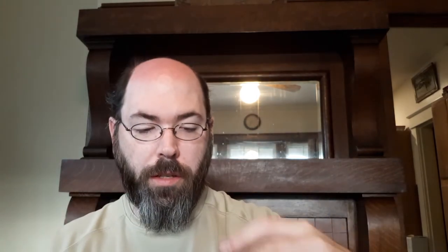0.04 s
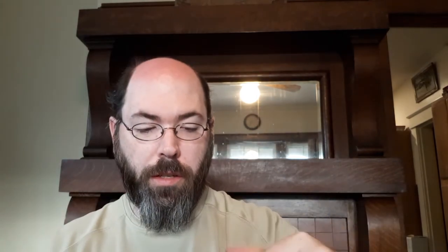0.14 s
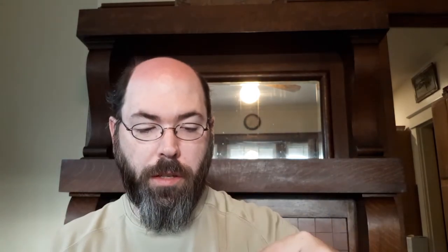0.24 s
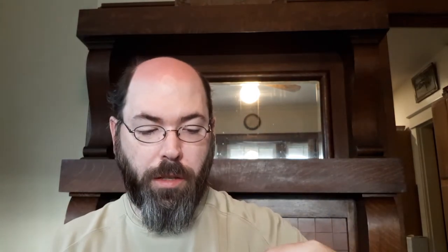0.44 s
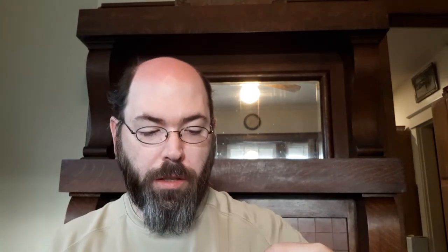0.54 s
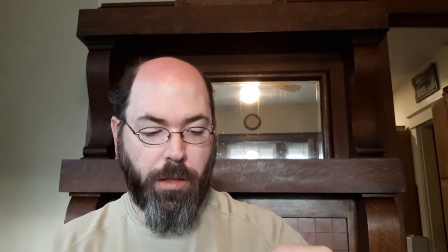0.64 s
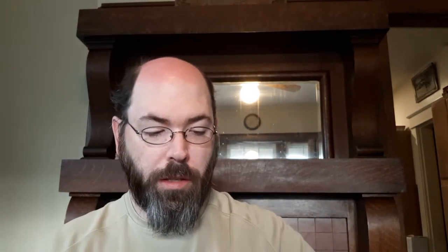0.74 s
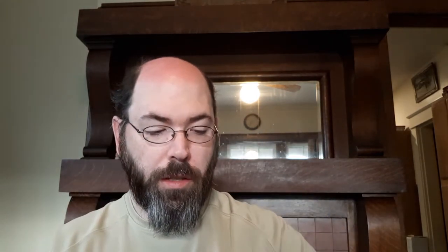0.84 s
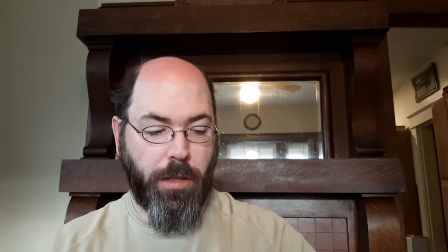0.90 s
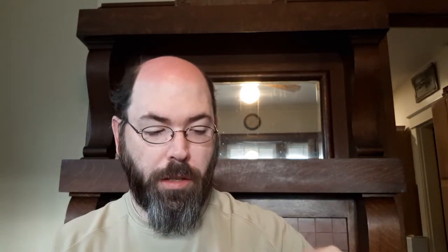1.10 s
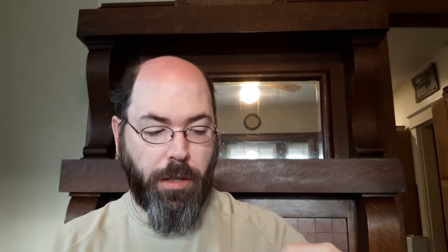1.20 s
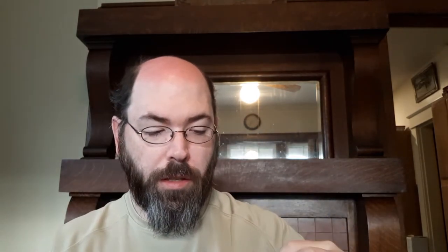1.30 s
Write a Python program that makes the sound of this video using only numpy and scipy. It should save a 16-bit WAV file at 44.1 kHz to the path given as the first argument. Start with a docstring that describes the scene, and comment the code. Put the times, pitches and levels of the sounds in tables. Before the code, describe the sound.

Screw cap being twisted off a hollow metal canteen, close and bright, with sharp clanks early, brief squeaks midway, separate clinks and a small loose rattle at the end, in a quiet, slightly reverberant room.

```python
"""An aluminium canteen is handled close to the microphone in a living room while its screw cap is twisted off.
It opens on a clink already ringing; the thread squeaks, then a cluster of hard clanks lands at 0.3 s.
Two more squeaks follow near half a second, with scattered clinks and then a light rattle after one second.
Clinks are noise cracks plus shell modes, pings are beating sines, squeaks are wavering harmonics with rasp.
The hollow body booms faintly after the clank and as the cap comes free; room tail, air and hum lie beneath."""
import sys
import numpy as np
from scipy import signal
from scipy.fft import rfft, irfft, next_fast_len
from scipy.io import wavfile
from scipy.ndimage import uniform_filter1d

SR = 44100
rng = np.random.default_rng(int(sys.argv[2]) if len(sys.argv) > 2 else 0)


def put_to_file(sound):
    """Save the sound as 16-bit audio at rate SR, in the file named by the first command-line argument."""
    columns = np.atleast_2d(sound).T  # one column per channel
    safe = np.clip(columns, -1, 1)
    whole_steps = np.round(safe * 32767)
    wavfile.write(sys.argv[1], SR, whole_steps.astype(np.int16))


N = 59535
LEAD_S = 0.1  # run-in before t = 0, cut off at the end of scene()
SIZE = N + int(LEAD_S * SR)
TIME = np.arange(SIZE) / SR
PORT_APART_HZ = 3640  # contact sounds grow unlike at the two microphone ports towards and above this pitch
ROOM_APART_HZ = 550  # the same for room tail and air


def undb(db):
    """Decibels to gain."""
    return 10 ** (np.asarray(db) / 20)


def lookup(points, hz):
    """Read (f/Hz, value) points on a log-frequency axis."""
    f, value = np.array(points, float).T
    return np.interp(np.log(hz + 1), np.log(f), value)


def colour(x, points):
    """Minimum-phase filter through (f/Hz, level/dB) points, so nothing sounds before its onset."""
    n = next_fast_len(x.shape[-1] + SR // 10, True)
    gain = undb(lookup(points, np.fft.rfftfreq(n, 1 / SR)))
    cepstrum = irfft(np.log(gain), n)
    # fold the cepstrum onto positive time
    cepstrum[1:n // 2] *= 2
    cepstrum[n // 2 + 1:] = 0
    response = np.exp(rfft(cepstrum))
    return irfft(rfft(x, n) * response, n)[..., :x.shape[-1]]


def unit(x):
    """Scale to rms 1."""
    return x / np.sqrt(np.mean(x ** 2))


def fade(t, t60):
    """Fall by 60 dB in t60 seconds."""
    return np.exp(-np.log(1000) * t / np.maximum(t60, 1e-3))


def stereo_noise(apart_hz):
    """White noise, alike in both channels well below apart_hz and drifting to unrelated above."""
    mid, side = rfft(rng.standard_normal((2, SIZE)))
    alike = 1 / (1 + (np.fft.rfftfreq(SIZE, 1 / SR) / apart_hz) ** 2)
    left_right = np.array([[1], [-1]])
    spectrum = mid * np.sqrt(1 + alike) + left_right * side * np.sqrt(1 - alike)
    return unit(irfft(spectrum, SIZE))


# spectrum of the still air in the room: f/Hz, relative level/dB
AIR_COLOUR = [(20, -12), (70, -3.5), (125, 3.5), (240, -6.5), (420, 2.5), (800, -17), (2000, -5.5),
              (7000, -13), (16000, -27)]


def background(air_db=-63.5, hum_hz=119, hum_db=-73.5):
    """Still air as coloured noise, and a low electrical hum as one steady sine; both levels are rms."""
    air = undb(air_db) * unit(colour(stereo_noise(ROOM_APART_HZ), AIR_COLOUR))
    hum = undb(hum_db) * np.sqrt(2) * np.sin(2 * np.pi * hum_hz * TIME)
    return air + hum


# decay of the room by band: f/Hz, t60/s
ROOM_DECAY = [(150, 0), (800, 0.54), (2000, 0.46), (5500, 0.42), (10000, 0.38), (15000, 0.54)]
# strength of the reflections: f/Hz, level/dB
ROOM_STRENGTH = [(100, 4), (220, -18), (450, 4), (900, -5.5), (1700, -8), (2600, -3), (5200, -3),
                 (8000, -8.5), (15000, -9.5)]


def room(x, build_s=0.0062):
    """Diffuse reflections: noise bands that swell quickly, each dying at its own rate."""
    noise, hz = rfft(stereo_noise(ROOM_APART_HZ)), np.fft.rfftfreq(SIZE, 1 / SR)
    tail = 0
    for k, (_, t60) in enumerate(ROOM_DECAY):
        # crossfade weight: 1 at this band's centre, 0 at its neighbours
        band = lookup([(f, j == k) for j, (f, _) in enumerate(ROOM_DECAY)], hz)
        shape = fade(TIME, t60) * (1 - np.exp(-(TIME / build_s) ** 2))
        tail = tail + irfft(noise * band, SIZE) * shape / np.linalg.norm(shape)
    return signal.fftconvolve(x, colour(tail, ROOM_STRENGTH), axes=1)[:, :SIZE]


# swell of the boom, after the hard clank and as the cap comes free: t/s, level/dB
BOOM_SWELL = [(.3, -69), (0.321, -54.5), (.48, -65.5), (.6, -67.5), (1.01, -100), (1.101, -68),
              (1.119, -49), (1.2, -63.5), (1.243, -54.5), (1.35, -76)]
# resonance of the hollow body: f/Hz, relative level/dB
HOLLOW_COLOUR = [(75, -40), (110, -13), (150, -1.5), (230, -5), (320, -12), (800, -26)]


def boom():
    """Handling stirs the air in the hollow body: low, coloured noise that swells and sinks."""
    at, db = np.array(BOOM_SWELL).T
    air = unit(colour(rng.standard_normal(SIZE), HOLLOW_COLOUR))
    return air * undb(np.interp(TIME - LEAD_S, at, db))


# one list per squeak of the thread: t/s, f/Hz, level/dB before harmonics and shell colour
THREAD_SQUEAKS = [
    [(.215, 1623, -37), (.220, 1441, -33.5), (.226, 1161, -27.5), (.2295, 1763, -25.5), (.233, 1750, -36.5),
     (.238, 1818, -19.5), (.243, 1770, -30.5)],
    [(.498, 1859, -32.5), (.503, 1847, -29), (.508, 1850, -38)],
    [(.552, 1557, -22), (.555, 1496, -38), (.565, 1449, -24.5), (.568, 1673, -30), (.5705, 1820, -27),
     (.575, 1770, -31)],
]
# strength of each harmonic from the fundamental up: level/dB
HARMONIC_LEVELS = [-5, -15, -17.5, -23.5]
# how the shell passes the squeak: f/Hz, level/dB
SHELL_PASS = [(700, -15), (1100, -6), (1850, 2), (2500, -3), (3150, 2), (4000, -6), (4700, -6), (5400, -4),
              (6100, -16), (7100, 3), (8000, -27), (15000, -39)]


def squeaks(jitter=0.0257, shimmer=0.2, rasp_db=-14):
    """The thread sticks and slips: harmonics with uneven pitch and level, and noise pulsing at each slip."""
    out, t = 0, TIME - LEAD_S
    for squeak in THREAD_SQUEAKS:
        at, hz, db = np.array(squeak).T
        waver, flutter = unit(uniform_filter1d(rng.standard_normal((2, SIZE)), size=40))
        pitch = np.interp(t, at, hz) * (1 + jitter * waver)
        phase = 2 * np.pi * np.cumsum(pitch) / SR
        sounding = (t > at[0]) * (t < at[-1])
        # a 60-sample average softens the edges
        level = uniform_filter1d(undb(np.interp(t, at, db)) * sounding, size=60)
        harmonics = [undb(h) * np.sin((k + 1) * phase) for k, h in enumerate(HARMONIC_LEVELS)]
        tone = np.sqrt(2) * sum(harmonics)
        rasp = undb(rasp_db) * (1 + np.cos(phase)) * rng.standard_normal(SIZE)
        out = out + level * (1 + shimmer * flutter) * (tone + rasp)
    return colour(out, SHELL_PASS)


# clear notes of the struck cap: t/s, level/dB of the first sine's peak, t60/s, beat/Hz of the mode pair
CAP_PINGS = [(-.035, -33, 0.28, 7.2), (.307, -22.5, 0.19, 5.9), (0.6, -45, 0.093, 4.3),
             (0.8663, -39, 0.3, 7.9), (1.09, -44, 0.12, 5.2)]


def pings(ping_hz=3348, partner_db=-1):
    """The cap's clear note, a beating pair of modes, damped more or less by the fingers."""
    out = 0
    for start, db, t60, beat_hz in CAP_PINGS:
        t = np.maximum(TIME - LEAD_S - start, 0)
        note = np.sin(2 * np.pi * ping_hz * t)
        partner = undb(partner_db) * np.sin(2 * np.pi * (ping_hz + beat_hz) * t)
        out = out + undb(db) * fade(t, t60) * (note + partner)
    return out


def ring(modes, t, tilt_db, pivot_hz=3190, scatter_db=5.5, grip_detune=0.0016):
    """Decaying shell modes; place of contact and grip shift each one's level and pitch a little."""
    out = 0
    for hz, db, t60 in modes:
        # high modes reach the two ports out of step
        port_phase = min(hz / PORT_APART_HZ / 2, np.pi / 4)
        phase = 2 * np.pi * rng.random() + np.array([[1], [-1]]) * rng.choice([-1, 1]) * port_phase
        scatter, detune = 2 * rng.random(2) - 1
        size = undb(db + tilt_db * np.log2(hz / pivot_hz) + scatter_db * scatter)
        mode_hz = hz * (1 + grip_detune * detune)
        out = out + size * fade(t, t60) * np.sin(2 * np.pi * mode_hz * t + phase)
    return out


# cap on shell: t/s, rise/s, level/dB of the crack before colouring, dull knock level/dB, treble level/dB,
# shell ring level/dB against the crack, ring tilt/dB per octave
CAP_CLINKS = [(-.035, 0.0034, -17, -2, 1.5, -9, 5), (.002, 0.00077, -37, -14, -11, 2, -6),
              (.185, 0.0019, -36, 11, -9, 0.5, 16), (0.193, 0.0031, -37, 6.5, -44, -7.5, -8),
              (0.2233, 0.0021, -34, 7.5, 6, -5.5, -13.5), (0.281, 0.0079, -29.5, 7, 10, -3.5, -6),
              (.302, 0.0015, -21, 8, -2, -9, 25), (0.3046, 0.0014, -14, -3.5, 3.5, 2, 2.5),
              (0.308, 0.0007, -18, -3.5, 14.5, -15, 19), (0.3141, 0.00046, -23, 0.5, -17.5, 3.5, -5.5),
              (0.334, 0.00075, -29, 17, 2, -17, -10), (.346, 0.0017, -26.5, -3, 10, -13, -11),
              (.381, 0.0086, -17, 17, -2, -16, 8), (.388, 0.0011, -50, 20, -8, -23, 4),
              (0.461, 0.00051, -33, -4.5, -3, 5.5, 2.5), (0.480, 0.0056, -24.5, 6, -5.5, -5, 0),
              (.500, 0.0017, -28, 3, -5, -4, 6), (0.597, 0.0011, -35, 16, -8.5, 3, 10),
              (0.646, 0.00052, -35, -22, 0, 4, -3), (0.6909, 0.00035, -16, -4.5, 4.5, -4, -3.5),
              (0.702, 0.00019, -38, 11, 20.5, -1, -10.5), (0.85, 0.00097, -32.5, 4.5, -7, -12, -12),
              (0.8641, 0.00039, -25.5, 1.5, 0, -5, -3), (.896, 0.00058, -34.5, -29, -9, 0, -7),
              (1.018, 0.0026, -27.5, 7, -5, -4.5, 13), (1.0375, 0.0014, -30, -9, -10.5, -0.5, 1),
              (1.064, 0.0018, -50.5, 22, 5, -2, 15), (1.072, 0.0011, -53, -2, 16.5, -20, -4),
              (1.081, 0.0043, -36, 9, 0, -11, -14), (1.091, 0.00023, -29.5, 15.5, -2.5, -0.5, 5.5),
              (1.1146, 0.00048, -30.5, 7, 4.5, -17, 15), (1.12, 0.0011, -42, -2, 8.5, -4, -16),
              (1.134, 0.0032, -36, -4, 14.5, -16, -12), (1.139, 0.0013, -33.5, 9, 1, -10.5, -6.5),
              (1.234, 0.0015, -41.5, -4, 6.5, 1, -4), (1.237, 0.00092, -32.5, 6.5, -1, -4, -5),
              (1.2408, 0.0011, -44, 15, -7, -6.5, -12.5)]
# ringing modes of the shell: f/Hz, level/dB before tilt and scatter, t60/s
SHELL_RING = [(1069.6, -28, 0.13), (1086.7, -20, 0.1), (1288, -35.5, 0.25), (1780, -20, 0.1),
              (1799, -18.5, 0.13), (2340, -14, 0.089), (2312, -10, 0.084), (2320, -41.5, 0.62),
              (2565, -31.5, 0.3), (2650, -47, 0.069), (3345, -13, 0.072), (4055, -15.5, 0.091),
              (4440, -42, 0.29), (4950, -46.5, 0.33), (5120, -27, 0.14), (5380, -28, 0.099),
              (5440, -26.5, 0.13), (5910, -28, 0.23), (6580, -40, .22), (6750, -48, 0.16),
              (6945, -26.5, 0.069), (7070, -26.5, 0.074), (7190, -35.5, 0.14), (10800, -45, 0.14)]
# spectrum of the dense, quickly damped shell modes: f/Hz, relative level/dB
CRACK_COLOUR = [(30, -51), (100, -34), (300, -18.5), (600, -19.5), (800, -15), (1100, 1), (1450, 1.5),
                (1820, 7), (2350, -3), (2750, -1), (3300, -3.5), (3750, -10.5), (4200, -4.5), (5600, -3),
                (7150, -0.5), (7650, -18.5), (8200, -9), (9100, -16.5), (10400, -13), (11500, -17.5),
                (16000, -22.5)]


def clinks(crack_t60_s=0.027, deep_hz=170, knock_hz=720, body_hz=1400, bright_from_hz=2300, treble_hz=4500):
    """Each contact gives a crack of dense modes and the ring of the shell, coloured by how hard it lands."""
    out, t = np.zeros((2, SIZE + SR)), TIME[:SR // 2]
    for start, rise, db, knock_db, treble_db, ring_db, tilt_db in CAP_CLINKS:
        noise = stereo_noise(PORT_APART_HZ)[:, :len(t)]
        crack = unit(colour(noise, CRACK_COLOUR)) * fade(t, crack_t60_s)
        hit = crack + undb(ring_db) * ring(SHELL_RING, t, tilt_db)
        onset = np.minimum(t / max(rise, 1e-4), 1)
        hardness = [(deep_hz, 0), (knock_hz, knock_db), (body_hz, 0), (bright_from_hz, 0), (treble_hz, treble_db)]
        i = int((start + LEAD_S) * SR)
        out[:, i:i + len(t)] += undb(db) * colour(hit * onset, hardness)
    return out[:, :SIZE]


# low cut on the shell sounds, only the rumble well below 100 Hz is weakened: f/Hz, level/dB
SHELL_LOW_CUT = [(30, -17), (100, -1), (250, 0), (500, -0.5)]


def scene(ping_room_db=-7):
    """The canteen and its cap close by, their reflections and the quiet room."""
    shell = colour(clinks() + squeaks(), SHELL_LOW_CUT)
    canteen, cap = shell + boom(), pings()
    reflections = room(canteen + undb(ping_room_db) * cap)
    return (canteen + cap + reflections + background())[:, -N:]


# left minus right at the microphone: f/Hz, level/dB
PORT_DIFFERENCE = [(200, 2), (1200, -1), (3300, -3), (5600, -1.5), (6500, 6), (7200, 17), (8300, 11),
                   (10000, 6), (15000, 1.5)]


def record(dry, top_hz=16000):
    """The two ports differ in colour; peaks beyond full scale clip, then a steep low-pass cuts the top."""
    ports = []
    for x, sign in zip(dry, (1, -1)):
        # each port takes half the difference
        ports.append(colour(x, [(hz, sign * db / 2) for hz, db in PORT_DIFFERENCE]))
    low_pass = signal.ellip(10, 0.2, 70, top_hz, fs=SR, output="sos")
    return signal.sosfilt(low_pass, np.clip(np.array(ports), -1, 1))


dry = scene()
out = record(dry)
put_to_file(out)
```